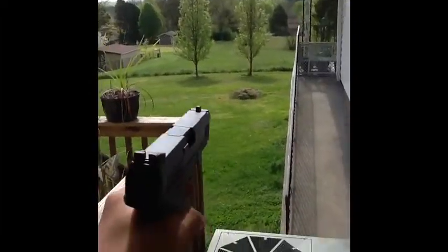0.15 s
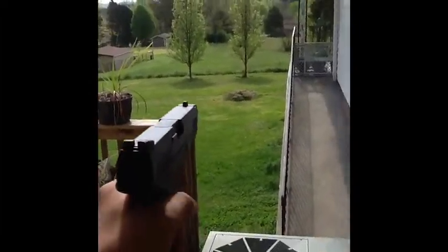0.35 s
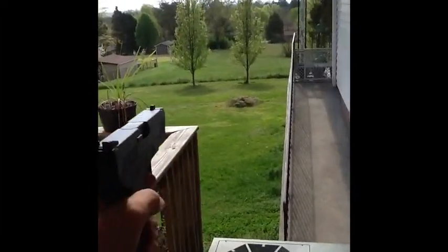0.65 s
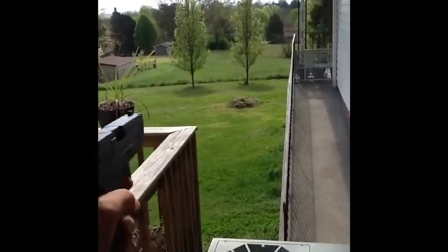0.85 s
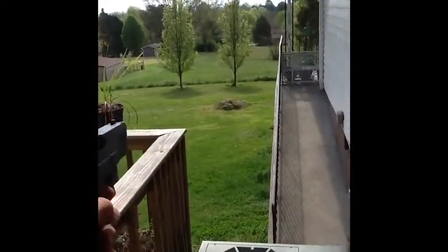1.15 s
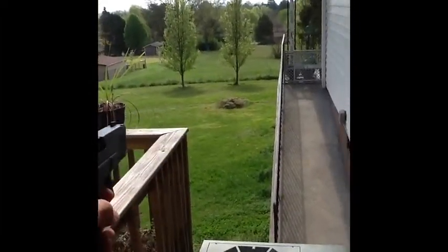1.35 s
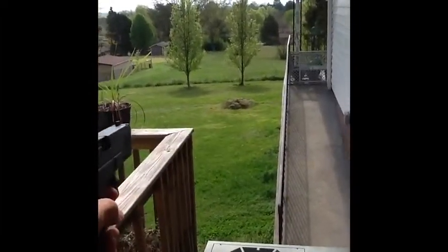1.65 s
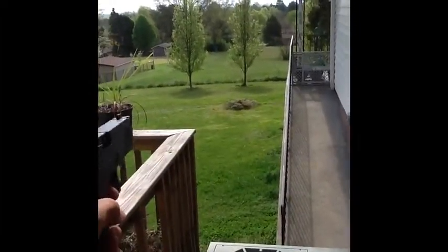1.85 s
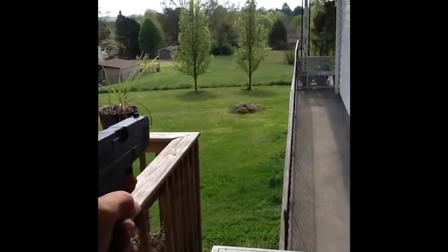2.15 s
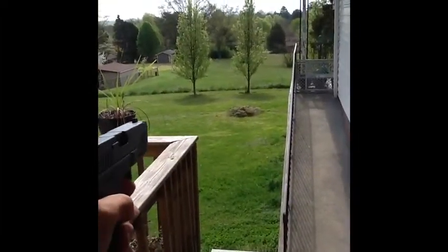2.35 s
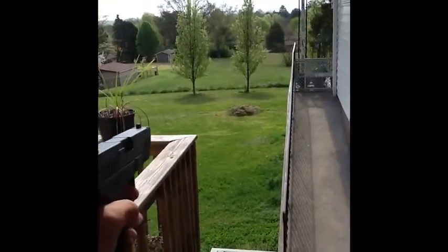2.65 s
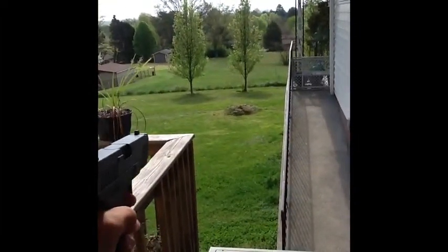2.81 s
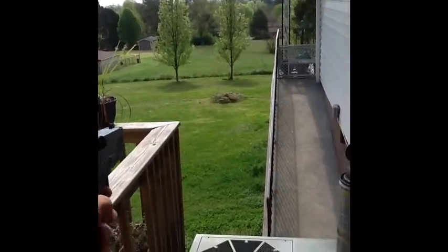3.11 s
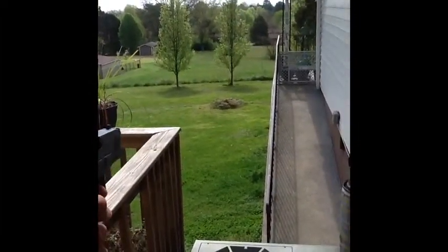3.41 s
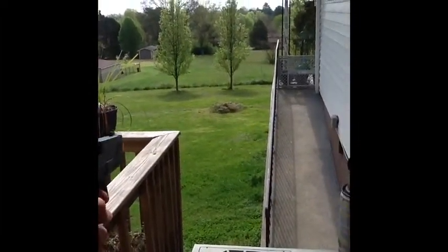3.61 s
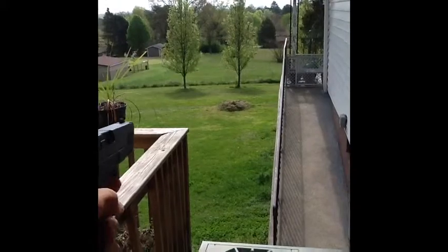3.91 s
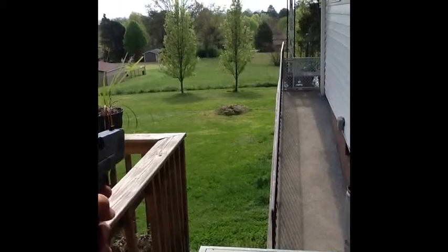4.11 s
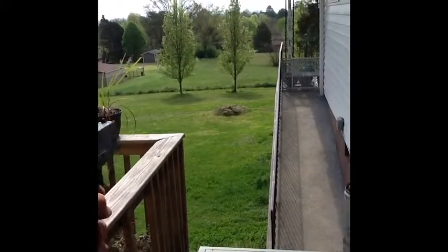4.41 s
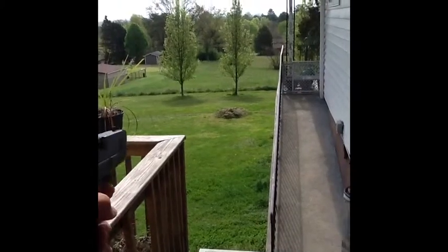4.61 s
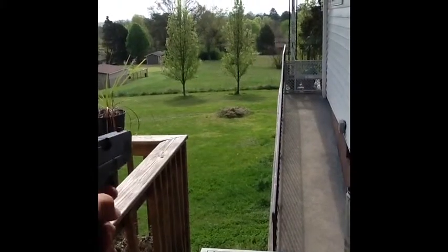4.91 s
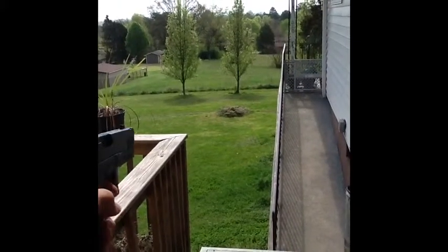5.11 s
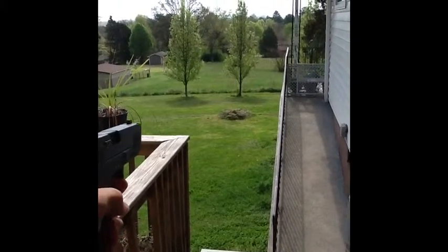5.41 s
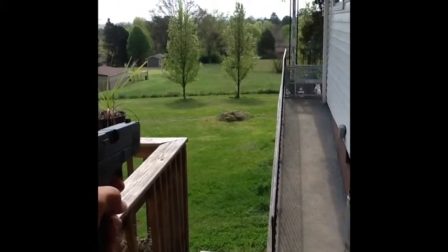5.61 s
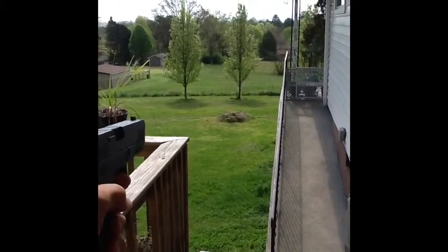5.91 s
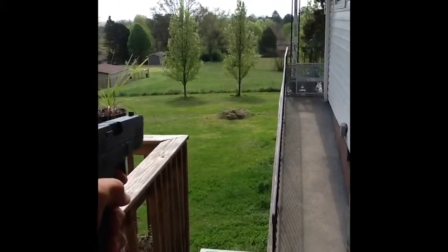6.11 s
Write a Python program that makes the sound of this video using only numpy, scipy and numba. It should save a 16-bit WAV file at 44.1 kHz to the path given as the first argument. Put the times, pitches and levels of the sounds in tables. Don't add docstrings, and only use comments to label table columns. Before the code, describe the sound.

For almost two seconds there is only a quiet yard: low town hum, a soft uneven breeze, far birds chirping, whistling and giving thin buzzes, and dull muffled knocks from a hand on the phone between 0.1 and 0.6 s. At 1.86 s a gas pistol fires very close: a hard bright crack and pop, a metallic slide clack, a short hiss, then the slide scraping and snapping shut about 50 ms later. A tiny trigger tick follows; reflections from porch and yard fade quickly, with a faint later answer from trees. The ambience drops abruptly, then creeps back with falling bird whistles near 2.6-3.3 s. More shots crack at 3.58, 4.42, 5.08, 5.72 and 6.19 s, similar but slightly varied, the later ones weaker in their first snap. Small chirps and ticks fill the gaps, one clear chirp at 4.2 s. It ends just after the last slide closes, around 6.26 s.

```python
import sys
import numpy as np
from scipy import signal
from scipy.fft import rfft, irfft
from scipy.io import wavfile
from scipy.ndimage import uniform_filter1d
from numba import njit

SR = 44100
rng = np.random.default_rng(int(sys.argv[2]) if len(sys.argv) > 2 else 0)


def waveform_to_disk(signal):
    frames = np.transpose(np.atleast_2d(signal))
    scaled = np.clip(frames, -1, 1) * 32767
    samples = np.round(scaled).astype(np.int16)
    wavfile.write(sys.argv[1], SR, samples)


def level_to_linear(level):
    exponent = np.asarray(level, float) / 20
    return 10 ** exponent


N = 275968

DUCK_DB = 9
# f/Hz, level/dB, t60/ms
SLIDE_MODES = [(1165, -5.5, 11), (1944, -1, 12), (4000, -2, 11), (5060, -7, 12), (6880, -5.5, 7.9),
               (8900, -4, 6)]
# f/Hz, level/dB, t60/ms
GRIP_MODES = [(245, -1.5, 67), (428, 1, 27), (562, 1.5, 35), (150, -20, 30)]


def add(out, s, sound):
    i = int(round(s * SR))
    out[i:i + len(sound)] += sound[:max(N - i, 0)]


def on_log(hz, points):
    point_hz, value = np.array(points).T
    return np.interp(np.log(hz + 1), np.log(point_hz), value)


def noise(points, size):
    spectrum = rfft(rng.standard_normal(size))
    x = irfft(spectrum * level_to_linear(on_log(np.fft.rfftfreq(size, 1 / SR), points)), size)
    return x / x.std()


def octaves(x, low_hz, count):
    place = np.log2(np.fft.rfftfreq(len(x), 1 / SR) / low_hz + 1e-9).clip(0, count - 1)
    spectrum = rfft(x)
    return [irfft(spectrum * np.clip(1 - np.abs(place - k), 0, 1), len(x)) for k in range(count)]


def walk(rate):
    k = int(SR / rate)
    held = np.repeat(rng.standard_normal(N // k + 1), k)
    return 1.2 * uniform_filter1d(held, k)[:N]


def ring(modes, db, rise_ms=0.17, rough=0., crack=0.):
    # f/Hz, level/dB
    contact = [(300, -30), (1200, -6.5), (2500, -3.5), (5000, -0.5), (9000, -3.5), (15000, -12.5)]
    t = np.arange(SR // 10)[:, None] / SR
    hz, mode_db, t60_ms = np.transpose(modes)
    level_chance, pitch_chance = rng.standard_normal((2, len(hz)))
    decay = level_to_linear(mode_db + 1.5 * level_chance - 6e4 * t / t60_ms)
    fade = decay * (1 - np.exp(-1e3 * t / rise_ms))
    rattle = 1 + rough * uniform_filter1d(rng.standard_normal(fade.shape), size=9, axis=0) * np.sqrt(9)
    tones = np.sin(2 * np.pi * hz * (1 + .03 * pitch_chance) * t)
    x = (fade * rattle * tones).sum(axis=1)
    x += crack * fade.mean(axis=1) * noise(contact, size=len(t))
    x = signal.sosfilt(signal.butter(2, hz.min() / 3, "high", fs=SR, output="sos"), x)
    return level_to_linear(db) * x / np.abs(x).max()


def air():
    # f/Hz, level/dB per Hz
    spectrum = [(20, -5), (45, -8), (90, -8.5), (140, -2), (285, -1), (500, -5.5), (1200, -10.5),
                (1700, -15), (2300, -16.5), (2900, -21), (4200, -22.5), (9000, -24.5), (14800, -26.5),
                (16000, -30)]
    # t/s, level/dB
    breeze = [(0, 2.5), (.55, 2), (1.4, 0), (1.85, -2.5), (2.7, -0.5), (2.9, 3), (3.3, 0), (4.7, -1.5),
              (5.5, -1.5), (6.26, -2.5)]
    swell = np.interp(np.arange(N) / SR, *np.transpose(breeze))
    bands = octaves(level_to_linear(-54.5) * noise(spectrum, size=N), 60, count=6)
    out = np.zeros(N)
    for band, share in zip(bands, [.7, 1, 1, .8, 0.28, 0]):
        out += band * level_to_linear(share * (swell + 1.3 * walk(12)))
    return out


def whistle(length, from_hz, to_hz, db):
    u = np.linspace(0, 1, int(length * SR))
    flutter = level_to_linear(1.8 * np.interp(u, np.linspace(0, 1, 7), rng.standard_normal(7)))
    peak = np.clip(15 * (to_hz / from_hz - 1), .1, .6)
    swell = np.minimum(u / peak, 1) * level_to_linear(-16 * np.clip(u - peak, 0, 1)) * np.minimum((1 - u) / .1, 1)
    phase = 2 * np.pi * np.cumsum(from_hz + (to_hz - from_hz) * u ** .6) / SR
    return 2 * level_to_linear(db) * swell * flutter * np.sin(phase)


def buzz(length, db):
    u = np.linspace(0, 1, int(length * SR))
    throb = 1 + 0.59 * np.sin(2 * np.pi * 180 * length * u)
    voice = noise([(5600, -31), (6300, -7), (7000, -5.5), (7700, 0.5), (8100, -10.5), (8500, -34.5)], size=len(u))
    return level_to_linear(db) * np.minimum(u / .05, 1) * np.exp(-u / 0.57) * throb * voice


def birds():
    # (length/s, from f/Hz, to f/Hz, level/dB)
    phrases = [
        ((.57, .125, 6), (.065, 4790, 4785, -71)),
        ((.44, .276, 6), (.05, 3420, 3180, -69)),
        ((1.09, .64, 2), (.035, 3750, 3600, -72)),
        ((.875, .315, 3), (.16, 2270, 2395, -65.5)),
        ((2.565, .352, 3), (.1, 2250, 1770, -65)),
        ((.04, .15, 2), (.13, 5960, 5900, -74)),
    ]
    # t/s, length/s, f/Hz, level/dB
    singles = [(0.672, .03, 2310, -65), (.78, .07, 1192, -59), (.87, .1, 1420, -63), (.79, .14, 7380, -73),
               (3.04, .04, 2200, -69), (3.12, .03, 2750, -67), (3.141, .09, 2410, -63),
               (3.531, .06, 4850, -63), (3.914, .13, 4830, -63), (3.929, .04, 4200, -67),
               (4.209, .09, 4790, -55), (4.332, .07, 3440, -70), (4.771, .06, 4000, -67.5),
               (4.821, .05, 2390, -61), (4.961, .07, 7420, -73)]
    # t/s, length/s, level/dB
    buzzes = [
        (.20, 0.097, -63.5),
        (1.41, .10, -61.5),
        (4.323, 0.11, -62),
    ]
    sag_hz_per_s, scatter_db, echo_db, echo_t60_s = 300, 0.5, -5.5, .25
    out = np.zeros(N)
    for (s, every, count), (length, from_hz, to_hz, db) in phrases:
        for k in range(count):
            note_db = db + scatter_db * rng.standard_normal()
            add(out, s + k * every, whistle(length, from_hz, to_hz, note_db))
    for s, length, hz, db in singles:
        add(out, s, whistle(length, hz, hz - sag_hz_per_s * length, db))
    for s, length, db in buzzes:
        add(out, s, buzz(length, db))
    t = np.arange(SR // 4) / SR
    leaves = rng.standard_normal(len(t)) * level_to_linear(-60 * t / echo_t60_s)
    return out + level_to_linear(echo_db) * signal.fftconvolve(out, leaves / np.linalg.norm(leaves))[:N]


def hand():
    # t/s, level/dB, f/Hz
    knocks = [
        (.090, -45, 180),
        (.120, -43.5, 318),
        (.232, -45.5, 450),
        (.263, -35, 318),
        (.420, -43.5, 318),
        (.590, -45.5, 171),
    ]
    out = np.zeros(N)
    for s, db, hz in knocks:
        add(out, s, ring([(hz, 0, 70), (1.9 * hz, -12, 40), (.6 * hz, -9, 70)], db, rise_ms=3.3))
    return out


def pop(hz, db, cycles=4.9):
    turn = np.arange(int(cycles * SR / hz)) * hz / SR
    return level_to_linear(db) * np.sin(np.pi * turn / cycles) ** 0.64 * np.sin(2 * np.pi * turn)


def vent(db):
    # f/Hz, level/dB per Hz
    jet = [(59, -47), (100, -28), (289, -3), (836, -7), (1060, -14), (1360, -3.5), (2080, -5), (2270, -2),
           (2930, -7), (4670, -4.5), (5650, -5.5), (9210, -12.5), (14400, -20.5), (16000, -47)]
    t = np.arange(SR // 4) / SR
    spurts = level_to_linear(2.2 * uniform_filter1d(rng.standard_normal(len(t)), size=49) * 7)
    return level_to_linear(db - 60 * t / .15) * (1 - np.exp(-t / .0015)) * spurts * noise(jet, size=len(t))


def shots(out, jolts):
    # t/s, valve level/dB, pop level/dB, pop f/Hz, gas level/dB
    events = [
        (1.8613, 2, 2, 4500, -15),
        (3.5813, -2.5, 2, 3950, -17),
        (4.4218, -3, 0, 4000, -15.5),
        (5.0830, -4, -2, 3920, -15.5),
        (5.7213, -6.5, -1.5, 3808, -15.5),
        (6.1937, -13, 0, 3957, -16.5),
    ]
    # f/Hz, level/dB, t60/ms
    valve = [(1540, -1, 4.5), (2200, -1.5, 6), (4400, -3.5, 4), (7800, -7, 4.4)]
    # f/Hz, level/dB, t60/ms
    pellet = [(1500, -1.5, 2.8), (3650, -6, 3.2), (6640, -4.5, 3), (9500, -9, 3.3)]
    # f/Hz, level/dB, t60/ms
    muzzle = [(1850, -5, 6), (6900, -3, 5.5), (11700, -14.5, 4), (14500, -21, 4)]
    for s, valve_db, pop_db, hz, gas_db in events:
        valve_s, pellet_s, pop_s = s + 1.9e-3, s + 3.95e-3, s + 4.9e-3
        add(out, s, ring(SLIDE_MODES, -27, rise_ms=2.5, rough=0.88, crack=1.5))
        add(out, valve_s, -ring(valve, valve_db, rough=.2))
        add(out, valve_s, vent(gas_db))
        add(out, pellet_s, ring(pellet, -2.5, rough=0.19))
        add(out, pop_s, pop(hz, pop_db - 2.5))
        add(out, pop_s, ring(muzzle, pop_db - 3.5, rise_ms=0.43, rough=.3, crack=0.86))
        add(out, pop_s, -ring(GRIP_MODES, pop_db - 21, rise_ms=0.5))
        add(out, pop_s + 2.5e-3, ring(pellet, pop_db - 7.5))
        add(jolts, pop_s, level_to_linear([gas_db + 17]))


def rear_stops(out, jolts):
    # t/s, clack level/dB, thud level/dB
    stops = [
        (1.8729, -3.5, -13),
        (3.5936, -1.5, -11.5),
        (4.4340, -8, -12),
        (5.0961, -6.5, -17),
        (5.7346, -8, -19.5),
        (6.2072, -8, -20.5),
        (1.8805, -7, -29),
        (5.7483, -11, -25),
        (4.4469, -15, -29.5),
    ]
    for s, clack_db, thud_db in stops:
        add(out, s, ring(SLIDE_MODES, clack_db, rise_ms=.3, rough=0.43, crack=1.1))
        add(out, s, ring(GRIP_MODES, thud_db, rise_ms=0.43))
        add(jolts, s, level_to_linear([clack_db - 6]))


def homecomings(out, jolts):
    # t/s, scrape level/dB, gap/ms, shut level/dB
    homes = [
        (1.9086, -13, 6.1, -10.5),
        (3.6338, -11.5, 5.4, -8.5),
        (4.4778, -9.5, 5.6, -13),
        (5.1382, -11.5, 6.1, -9.5),
        (5.7807, -8.5, 4.5, -10.5),
        (6.2517, -10.5, 2.5, -10.5),
    ]
    # f/Hz, level/dB, t60/ms
    scrape = [(4080, -7.5, 30), (6860, -3.5, 40), (8830, -2, 24), (10240, -5.5, 14), (12300, -13, 12)]
    # f/Hz, level/dB, t60/ms
    shut = [(1250, -10.5, 18), (1764, -3.5, 28), (2254, -4.5, 30), (5230, -4.5, 15), (6680, -5, 15)]
    for s, scrape_db, gap_ms, shut_db in homes:
        shut_s = s + gap_ms / 1e3
        add(out, s, ring(scrape, scrape_db, rise_ms=1.5, rough=.7, crack=0.98))
        add(out, shut_s, ring(shut, shut_db, rise_ms=.8, rough=.6, crack=1.0))
        add(jolts, shut_s, level_to_linear([shut_db + 3]))


def trigger_ticks(out, jolts):
    # t/s, level/dB, bright part/dB relative
    ticks = [(1.9914, -31.5, 0), (3.7261, -37, 2), (4.5910, -32.5, 6.5), (5.2510, -30.5, 2),
             (5.8835, -30, 1), (4.9031, -48, -6), (5.6071, -48.5, -8.5), (6.1444, -39, -5.5),
             (2.3908, -61, 25.5), (4.0771, -69, 10), (4.9521, -69, 7)]
    # f/Hz, level/dB, t60/ms
    sear = [(1903, 1, 26), (1450, -6.5, 17), (4500, -0.5, 12)]
    # f/Hz, level/dB, t60/ms
    sear_bright = [(6727, -4, 16), (7850, -8, 11.4), (9500, -10.5, 8), (4900, -13, 8)]
    for s, db, bright_db in ticks:
        add(out, s, ring(sear, db, rough=.3) + ring(sear_bright, db + bright_db, rough=.4, crack=.25))
        add(jolts, s, level_to_linear(db + bright_db - 6.5) * np.array([1., -2., 1.]))


def pistol():
    out, jolts = np.zeros(N), np.zeros(N)
    for mechanism in (shots, rear_stops, homecomings, trigger_ticks):
        mechanism(out, jolts)
    return out, jolts


def echoes(x):
    # f/Hz, level/dB per Hz
    yard = [(120, -36), (250, -0.5), (520, -8.5), (850, -15), (1200, -2), (1700, -1), (2250, -1),
            (3100, -9.5), (4200, -3), (5200, -1.5), (6800, -5.5), (9200, -8.5), (12000, -18.5),
            (15500, -24)]
    yard_t60_s = [.1, .3, .17, .21, 0.3, .29, 0.31, .22]
    # f/Hz, level/dB
    trees = [(500, -30), (1950, 1), (3100, -9.5), (4100, -4), (5200, -2), (6400, -14), (12000, -25)]
    t = np.arange(SR) / SR
    near = np.zeros(SR)
    for band, t60 in zip(octaves(noise(yard, size=SR), 110, count=8), yard_t60_s):
        near += band * level_to_linear(-60 * t / t60)
    near *= level_to_linear(2.5 * walk(500)[:SR])
    near *= level_to_linear(-33) * np.clip((t - .002) / .010, 0, 1)
    far = level_to_linear(-70.5 - 60 * t / 2.57) * np.clip((t - .22) / 0.19, 0, 1)
    far *= noise(trees, size=SR) * np.sqrt(1 - t)
    return signal.fftconvolve(x, near + far)[:N]


def scene():
    background = air() + hand() + birds()
    gun, jolts = pistol()
    shooting = gun + echoes(level_to_linear(-17.5) * gun + level_to_linear(13.5) * jolts)
    return (level_to_linear(DUCK_DB) * shooting + background)[None]


@njit
def ducking(x, top, hold, release):
    out, d, wait = np.empty(len(x)), 0., 0.
    for i in range(len(x)):
        wait = hold if abs(x[i]) > top else wait - 1
        d = 1. if wait > 0 else d * release
        out[i] = d
    return out


def band_limit(x):
    return signal.sosfilt(signal.butter(12, 16250, fs=SR, output="sos"), x)


def record(dry):
    hold_s, release_s = .3, .9
    duck = ducking(dry[0], 1., hold_s * SR, np.exp(-1 / (release_s * SR)))
    ahead = np.roll(uniform_filter1d(duck, size=45), -30)
    x = dry * level_to_linear(-DUCK_DB * ahead)
    x = .92 * x / (1 + np.abs(x) ** 6) ** (1 / 6)
    x = signal.sosfilt(signal.butter(4, 80, "high", fs=SR, output="sos"), x)
    x = signal.sosfilt(signal.cheby1(10, .3, 15300, fs=SR, output="sos"), x)
    return band_limit(x)


dry = scene()
out = record(dry)
waveform_to_disk(out)
```